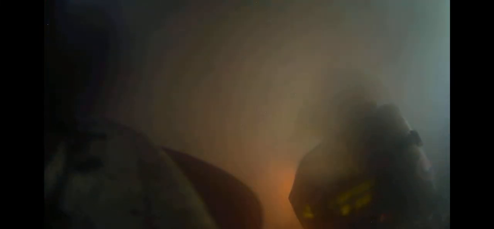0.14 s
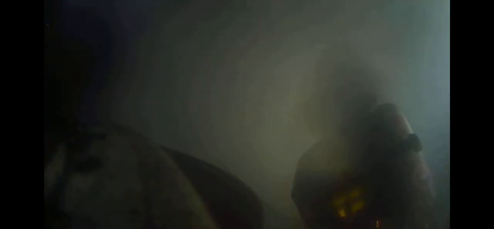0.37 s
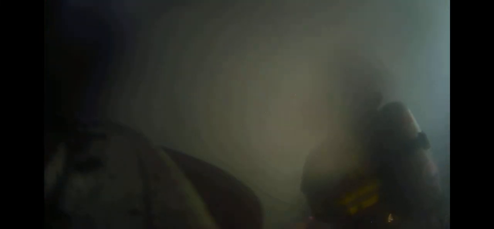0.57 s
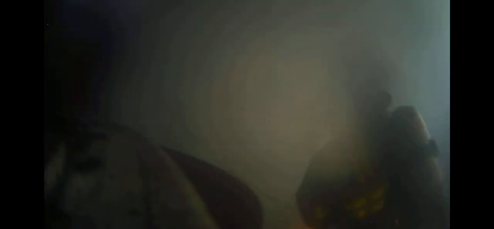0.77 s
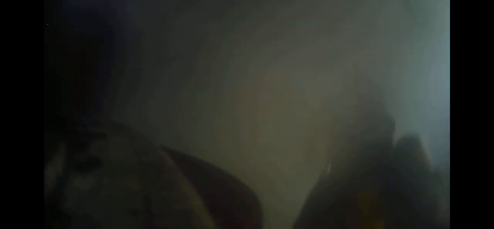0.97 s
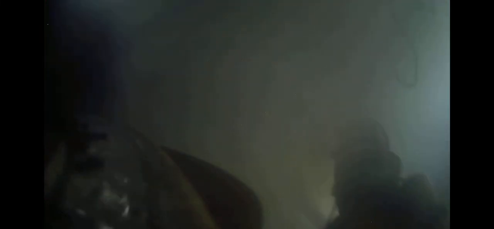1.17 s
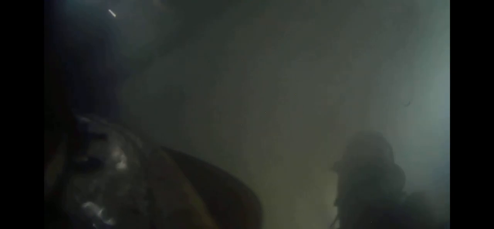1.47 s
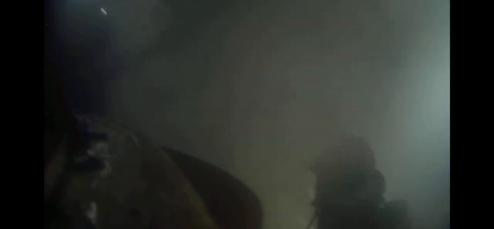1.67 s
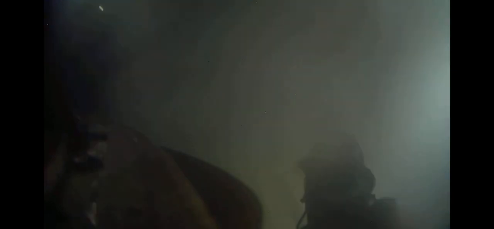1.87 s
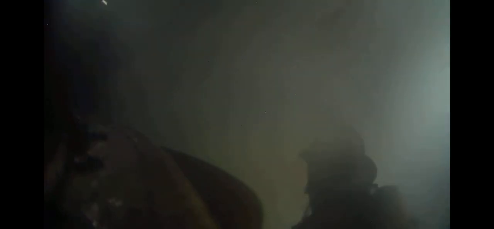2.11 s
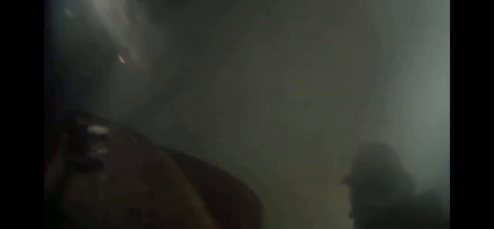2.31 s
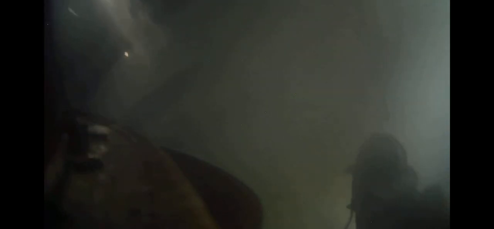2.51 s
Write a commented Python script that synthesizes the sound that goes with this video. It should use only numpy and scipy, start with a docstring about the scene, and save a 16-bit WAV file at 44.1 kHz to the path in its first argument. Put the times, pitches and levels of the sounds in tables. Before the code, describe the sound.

A fire hose hisses in uneven surges inside a smoky room, thin and boxy through a sealed camera case. Close gear knocks, scuffs and rumbles against the microphone, clothing rustles, and one water drop plops partway through.

```python
"""The hiss of a fire hose fills a smoky room, surging as the jet moves. The microphone sits inside
the sealed case of a camera worn on a firefighter's gear, so the spray comes through thin and boxy.
Close by, clothing rustles and the hose drags. Right at the microphone, gear knocks and scuffs the
case and jolts it into a low rumble, and about a second in one drop of water plops on it."""
import sys
import numpy as np
from scipy import signal
from scipy.fft import rfft, irfft
from scipy.io import wavfile
from scipy.ndimage import uniform_filter1d

SR = 44100
rng = np.random.default_rng(int(sys.argv[2]) if len(sys.argv) > 2 else 0)


def generate_wav(sig):
    """Save sig (samples, or channels by samples) to the path in sys.argv[1] as 16-bit PCM at SR."""
    pcm = np.round(np.clip(np.atleast_2d(sig).T, -1, 1) * 32767).astype(np.int16)
    wavfile.write(sys.argv[1], SR, pcm)


N = 116865
T = np.arange(N) / SR


def amp(db):
    """Decibels to gain."""
    return 10 ** (np.asarray(db) / 20)


def unit(x):
    """Scales to rms 1."""
    return x / np.sqrt(np.mean(x ** 2) + 1e-20)


def level(points):
    """Gain over time from (s, dB) points."""
    return amp(np.interp(T, *np.transpose(points)))


def colour(x, points):
    """Filters x by a curve of (Hz, dB) points and scales it to rms 1."""
    point_hz, db = np.transpose(points)
    hz = np.fft.rfftfreq(N, 1 / SR)
    gain = amp(np.interp(np.log(hz + 1), np.log(point_hz), db))
    return unit(irfft(rfft(x) * gain, N))


def flutter(rate_hz, depth_db):
    """A gain that wanders at random."""
    hz = np.fft.rfftfreq(N, 1 / SR)
    band = hz / rate_hz * np.exp(-(hz / rate_hz) ** 2)
    wander = irfft(rfft(rng.standard_normal(N)) * band, N)
    return amp(depth_db * unit(wander))


def grains(per_s, spread_db, share):
    """Tiny impacts of uneven size in smooth noise; share is their part of the power."""
    hits = (rng.random(N) < per_s / SR) * rng.choice([-1, 1], N)
    sizes = amp(spread_db * np.minimum(rng.exponential(1, N), 4))
    return np.sqrt(share) * unit(hits * sizes) + np.sqrt(1 - share) * rng.standard_normal(N)


def patchy(x, depth_db):
    """Narrow patches of the spectrum swell and fade at random."""
    frames = dict(nperseg=1024, noverlap=768)
    spectra = signal.stft(x, **frames)[2]
    patches = uniform_filter1d(rng.standard_normal(spectra.shape), size=3, axis=0)
    patches = unit(uniform_filter1d(patches, size=12, axis=1))
    return signal.istft(spectra * amp(depth_db * patches), **frames)[1][:N]


def case(x):
    """The sealed case round the microphone passes mostly 1-4 kHz."""
    # Hiss as it comes through the case. Each row: frequency in Hz, relative level in dB.
    response = [(300, -17.5), (600, -20), (850, -25.5), (1000, -14.5), (1250, -1), (1430, 1.5),
                (1750, -3.5), (2060, -2), (2350, -5), (2850, -22.5), (3200, -20.5), (3700, -13.5),
                (4100, -25.5), (4500, -35), (5150, -42.5), (5550, -29), (6150, -40), (6600, -27),
                (7100, -35.5), (7700, -34), (8500, -43.5), (15000, -49)]
    return colour(x, response)


def spray():
    """Out in the room, the jet throws dense droplets in a hiss that surges as it moves."""
    # Strength of the spray. Each row: time in seconds, level in dB.
    surges = [(0, -42.5), (.14, -43.5), (.26, -44.5), (.32, -47), (.41, -50.5), (.48, -45), (.58, -39.5),
              (.64, -45.5), (.72, -38), (.81, -42.5), (.86, -39.5), (.93, -45.5), (1.01, -45),
              (1.09, -43.5), (1.17, -50), (1.25, -47.5), (1.31, -46.5), (1.38, -39), (1.45, -43),
              (1.50, -50), (1.58, -43), (1.65, -51.5), (1.78, -42.5), (1.87, -50.5), (2.0, -47),
              (2.12, -43), (2.19, -53), (2.36, -48), (2.46, -47.5), (2.54, -45), (2.65, -46)]
    # Swing of the treble on top of that. Each row: time in seconds, gain in dB.
    treble_swing = [(0, -6), (.14, 4), (.3, -6), (.45, 0.5), (.53, 4.5), (.6, -3.5), (.7, 3), (.76, -1),
                    (.81, 1.5), (.97, 0), (1.08, 1.5), (1.4, 1), (1.57, 2.5), (1.64, 2.5), (1.78, 0),
                    (1.92, 2), (2.08, 0), (2.25, 1.5), (2.65, 0.5)]
    droplets = patchy(grains(per_s=1200, spread_db=1.5, share=0.23), depth_db=1.9)
    hiss = case(droplets) * flutter(rate_hz=22, depth_db=0.8)
    treble = signal.sosfiltfilt(signal.butter(3, 2800, "high", fs=SR, output="sos"), hiss)
    return (hiss - treble + treble * level(treble_swing)) * level(surges)


def background():
    """A faint, steady noise lies under everything."""
    # Its colour. Each row: frequency in Hz, relative level in dB.
    spectrum = [(30, 2.5), (100, 5), (400, -15), (900, -19.5), (3000, -42.5), (5000, -23.5),
                (9000, -26), (15000, -29.5)]
    return amp(-60) * colour(rng.standard_normal(N), spectrum)


def rustle():
    """Heavy clothing and hose shift close to the microphone with a muffled grain."""
    # Colour of the rustle. Each row: frequency in Hz, relative level in dB.
    muffled = [(40, 3), (80, -5), (115, -2.5), (150, 2.5), (210, -6), (330, -6.5), (450, -14), (600, -21.5),
               (900, -32.5), (2000, -54)]
    # Strength of the movement. Each row: time in seconds, level in dB.
    movement = [(0, -43.5), (.17, -48), (.3, -53), (.41, -56), (.49, -46), (.64, -52), (.72, -42.5),
                (.86, -48), (1.0, -49.5), (1.12, -51.5), (1.23, -57.5), (1.39, -46.5), (1.55, -50),
                (1.66, -55), (1.78, -44.5), (1.95, -56), (2.09, -43), (2.19, -56.5), (2.45, -51.5),
                (2.65, -50.5)]
    return colour(grains(per_s=150, spread_db=0, share=0.39), muffled) * level(movement)


def rumble():
    """The camera sways all the time, and each jolt rocks it and its microphone for a few cycles."""
    # Jolts. Each row: centre and half-width in seconds, pitch in Hz, peak level in dB.
    jolts = [(.15, 0.023, 24, -31), (0.213, 0.023, 29, -22.5), (0.288, 0.039, 25.7, -30.5),
             (0.49, 0.026, 34.5, -31), (0.724, 0.015, 34, -24.5), (.768, .018, 32.5, -25),
             (.845, 0.042, 16.8, -26.5), (2.13, 0.068, 33.8, -36)]
    # Colour of the sway. Each row: frequency in Hz, relative level in dB.
    sway = [(8, -11.5), (22, 1), (45, -4.5), (70, -13.5), (130, -30.5), (400, -68)]
    out = np.zeros(N)
    for centre, width, hz, db in jolts:
        t = T - centre
        out += amp(db) * np.exp(-(t / width) ** 2) * np.sin(2 * np.pi * (hz * t + rng.random()))
    return out + amp(-47.5) * colour(rng.standard_normal(N), sway)


def knocks(rise_s=0.0036):
    """Soft blows of gear on the case ring a few low, damped modes."""
    # Blows. Each row: start in seconds, level in dB, base pitch in Hz.
    blows = [(0.141, -39, 131), (0.223, -37.5, 135.6), (.347, -31.5, 156), (.45, -41, 105),
             (0.596, -35, 152), (.68, -39, 160), (1.368, -28.5, 174.5), (1.44, -38.5, 152),
             (2.067, -29.5, 133), (2.264, -41.5, 141)]
    # Modes. Each row: multiple of the base pitch, gain in dB, seconds to fall 60 dB.
    modes = [(0.999, 1.5, .11), (1.5, -7.5, 0.055), (2.1, -12, 0.075), (3.05, -24, 0.072)]
    out = np.zeros(N)
    for start, db, hz in blows:
        t = np.maximum(T - start, 0)
        attack = 1 - np.exp(-t / rise_s)
        for ratio, mode_db, t60 in modes:
            ring = np.sin(2 * np.pi * (hz * ratio * t + rng.random()))
            out += amp(db + mode_db - 60 * t / t60) * attack * ring
    return out


def scuffs():
    """Gear scrapes the case in short, gritty strokes, right at the microphone."""
    # Strokes. Each row: peak time, rise and decay in seconds, level in dB.
    strokes = [(.228, .012, .015, -42.5), (.36, 0.017, 0.019, -43), (0.698, 0.022, 0.025, -31.5),
               (1.92, 0.017, 0.012, -42), (2.071, 0.0033, .018, -29), (2.246, 0.028, 0.023, -44.5),
               (2.335, .005, 0.019, -46), (2.413, 0.0021, 0.0093, -40)]
    # Colour of a scrape outside the case. Each row: frequency in Hz, relative level in dB.
    scrape = [(250, 4), (700, -3), (1050, 1), (1400, -2.5), (2100, 1.5), (3700, -3.5), (7000, -2),
              (12000, -3)]
    push = sum(amp(db) * np.exp(np.where(T < peak, (T - peak) / rise, (peak - T) / decay))
               for peak, rise, decay, db in strokes)
    grit = colour(grains(per_s=990, spread_db=3, share=0.28), scrape)
    return push * case(grit)


def hose_rubs():
    """The hose drags nearby with a hollow, grainy sound."""
    # Drags. Each row: centre and half-width in seconds, level in dB.
    drags = [(.88, 0.12, -56), (1.12, 0.061, -51), (1.39, 0.086, -44), (1.78, 0.043, -50)]
    # Colour of the rubbing hose. Each row: frequency in Hz, relative level in dB.
    hollow = [(100, -32), (180, -6.5), (265, -2), (325, 2), (420, -7), (520, -13.5), (700, -25),
              (1500, -54)]
    push = sum(amp(db) * np.exp(-((T - centre) / width) ** 2) for centre, width, db in drags)
    return push * colour(grains(per_s=400, spread_db=0.5, share=0.32), hollow)


def plop():
    """A drop lands on the case with a tick and four blips, each lower and weaker than the last."""
    first_s, first_db, first_hz, width_s = 0.9917, -25, 1330, 0.00095
    gap_s, step_db, pitch_ratio = 0.0024, -3.5, 0.76  # from one rebound to the next
    blips = np.zeros(N)
    for k in range(4):
        t = T - first_s - k * gap_s
        tone = np.cos(2 * np.pi * (first_hz * pitch_ratio ** k * t + rng.random()))
        blips += amp(first_db + k * step_db) * np.exp(-(t / width_s) ** 2) * tone
    t = np.maximum(T - first_s + width_s, 0)
    splash = colour(rng.standard_normal(N), [(500, 7), (1800, -13), (3000, -10), (5800, -3), (9000, -28)])
    tick = splash * (t > 0) * np.exp(-t / 0.0036)
    return blips + amp(-48) * tick


def scene():
    """The room, the gear and the case, all at the one microphone."""
    steady = background()
    return (spray() + scuffs() + rustle() + hose_rubs() + knocks() + rumble() + plop() + steady)[None]


def record(dry):
    """The camera cuts off the highest treble."""
    lowpass = signal.firwin(511, cutoff=15650, window=("kaiser", 9), fs=SR)
    return signal.oaconvolve(dry, lowpass[None], "same")


dry = scene()
out = record(dry)
generate_wav(out)
```